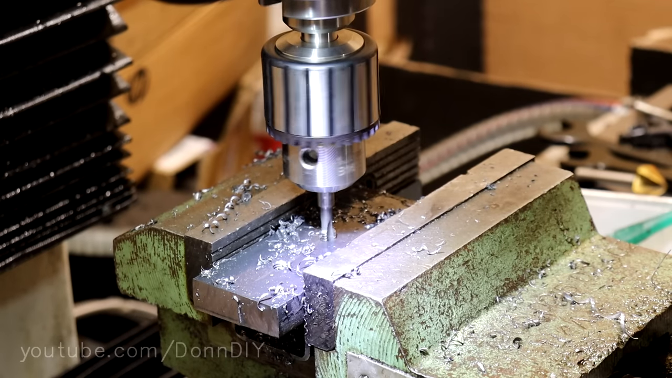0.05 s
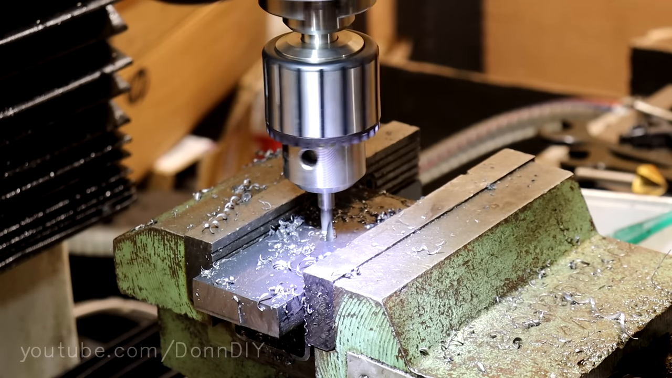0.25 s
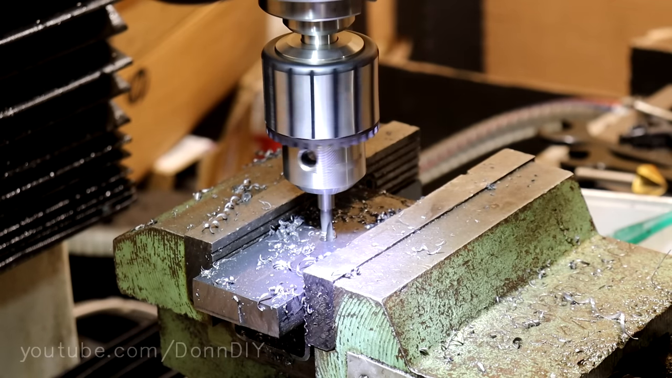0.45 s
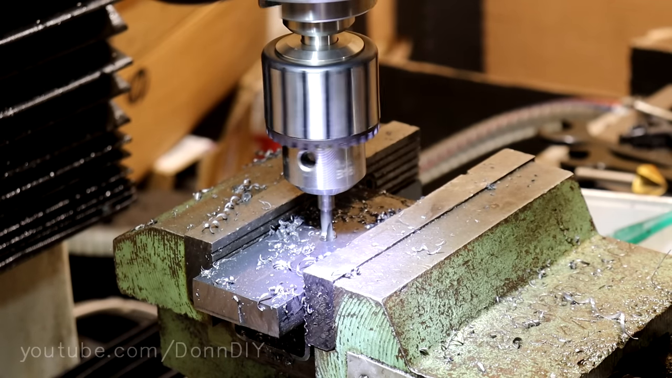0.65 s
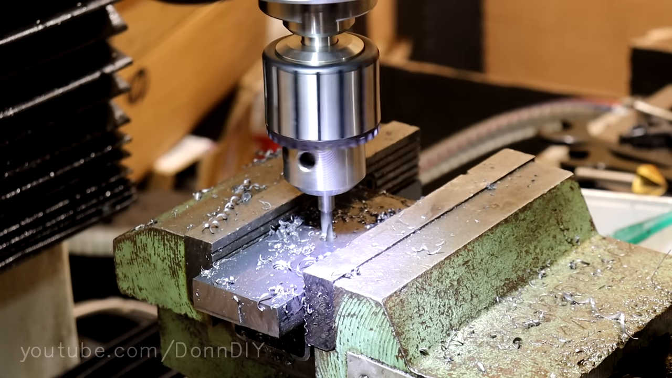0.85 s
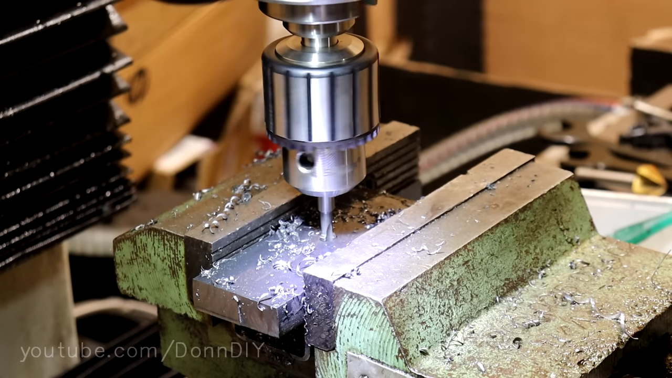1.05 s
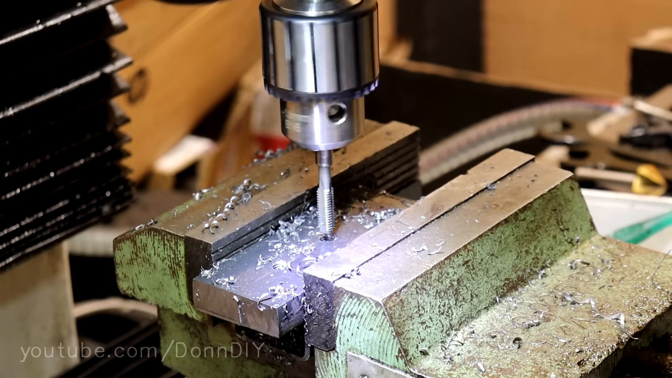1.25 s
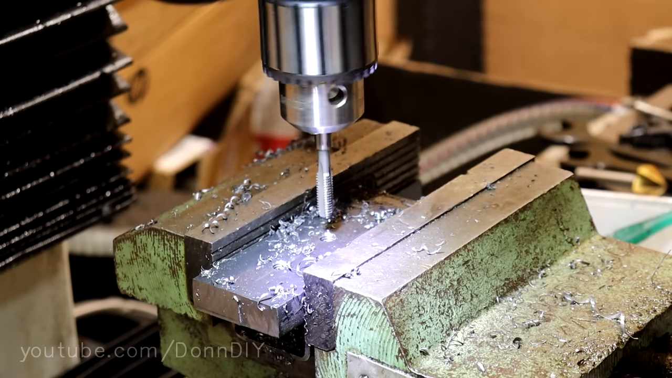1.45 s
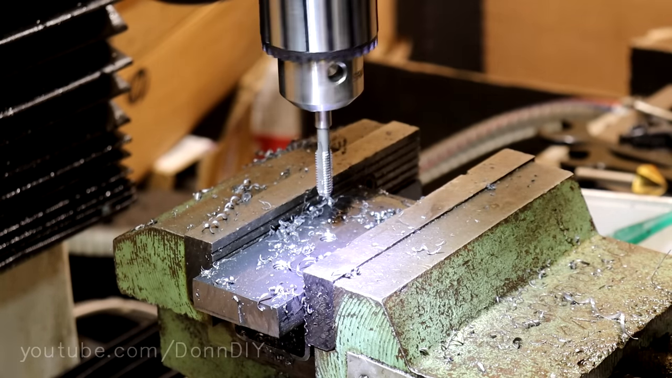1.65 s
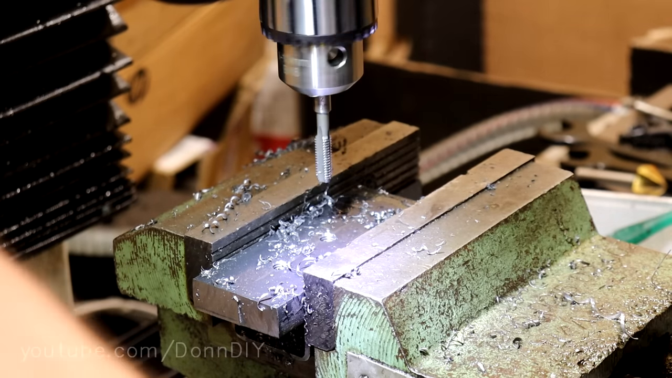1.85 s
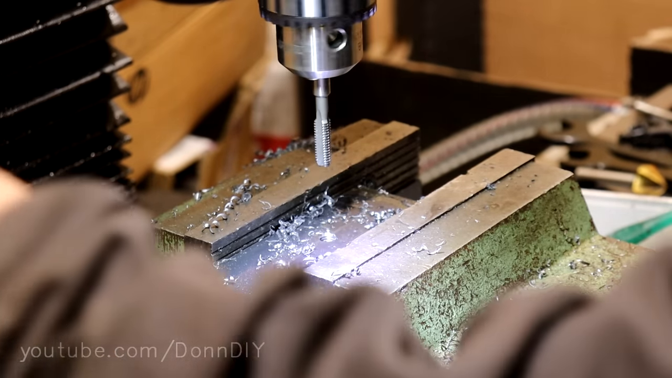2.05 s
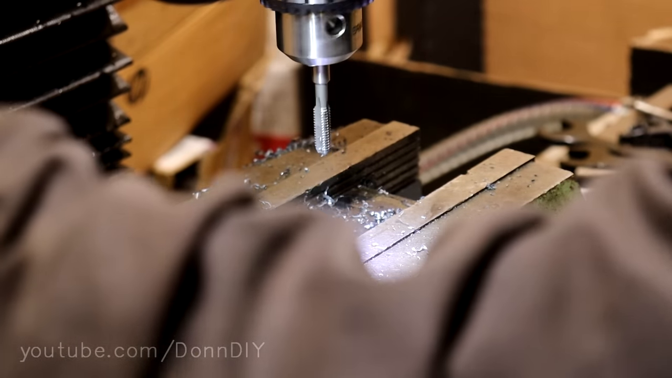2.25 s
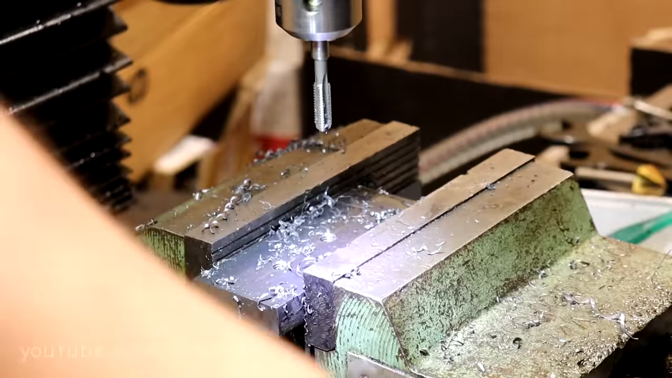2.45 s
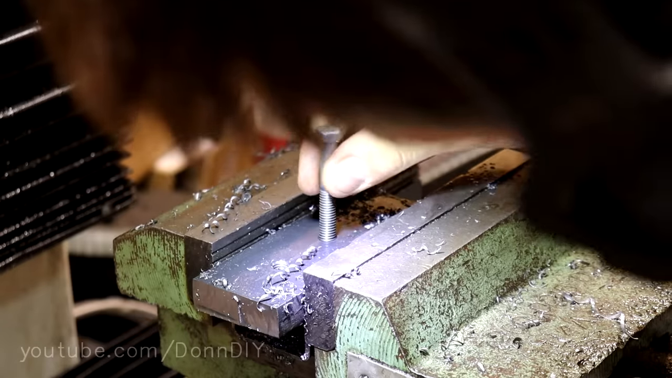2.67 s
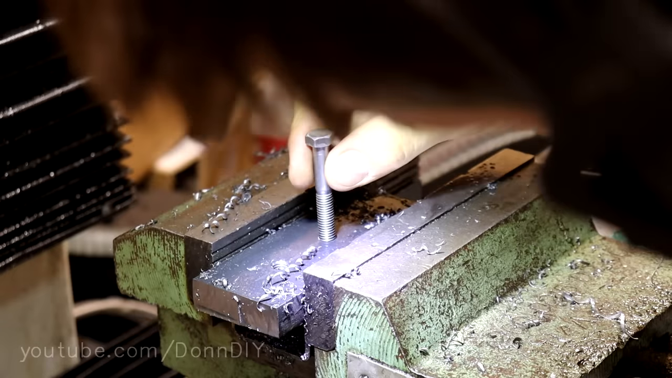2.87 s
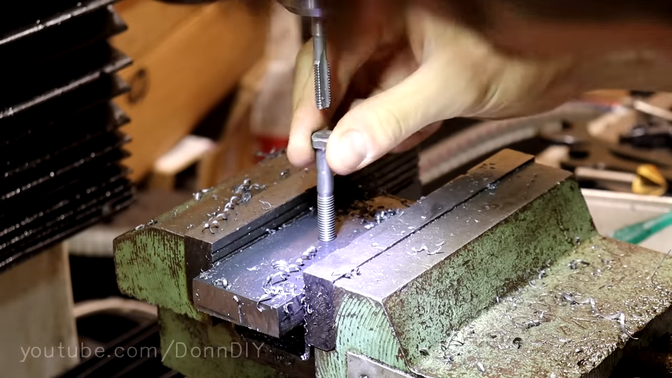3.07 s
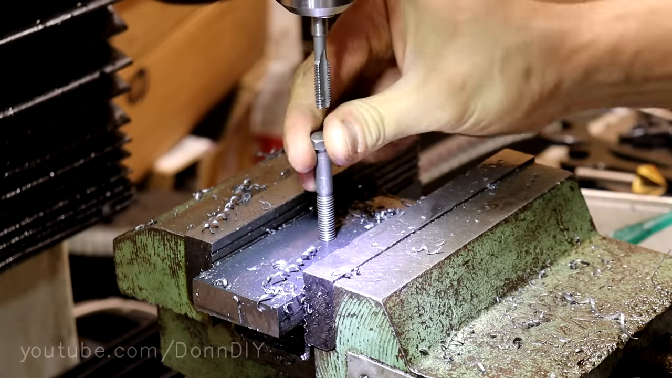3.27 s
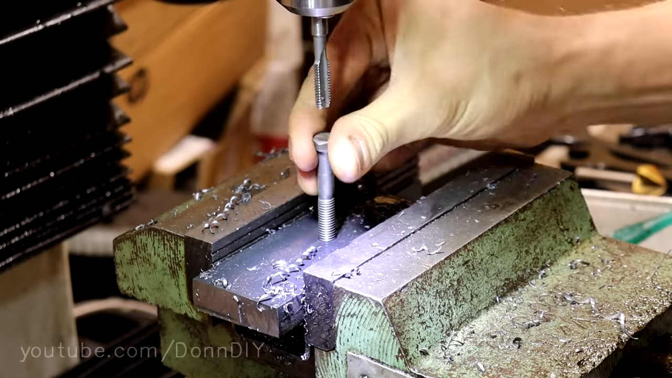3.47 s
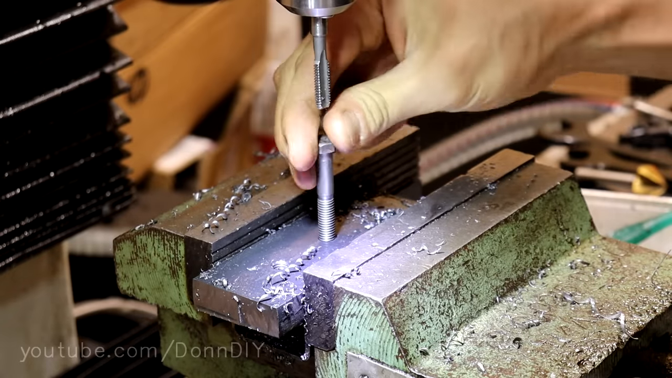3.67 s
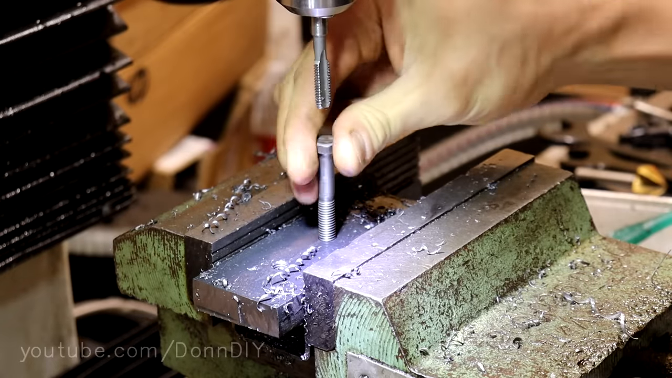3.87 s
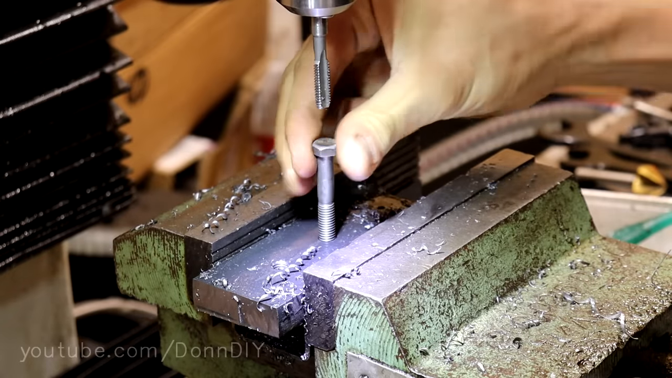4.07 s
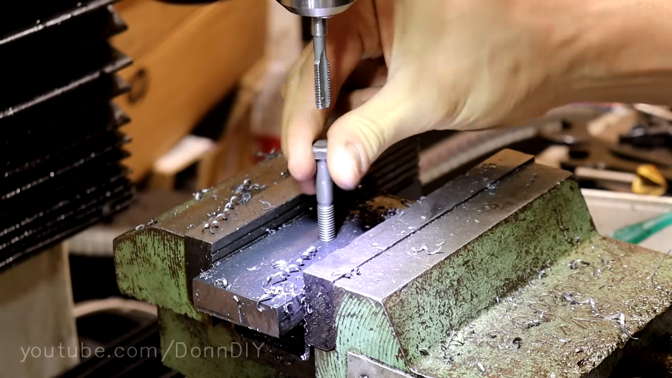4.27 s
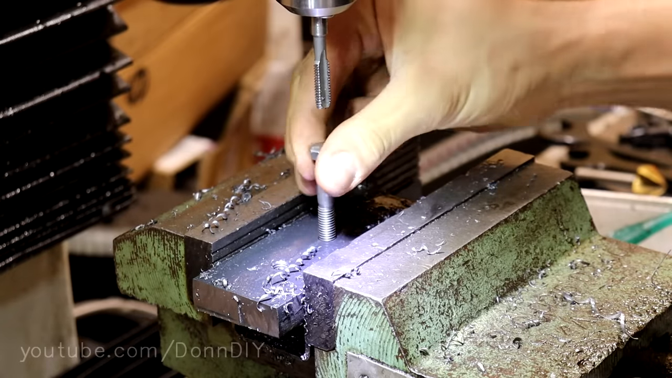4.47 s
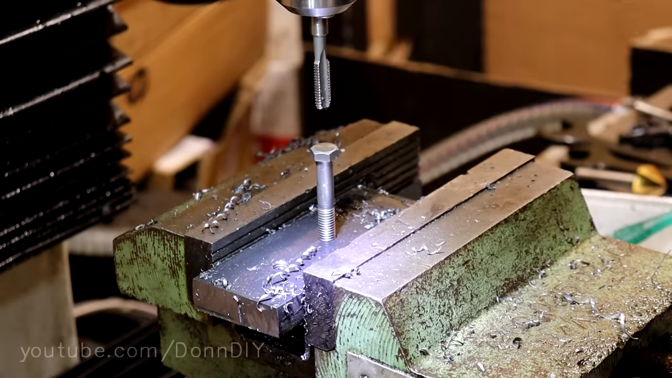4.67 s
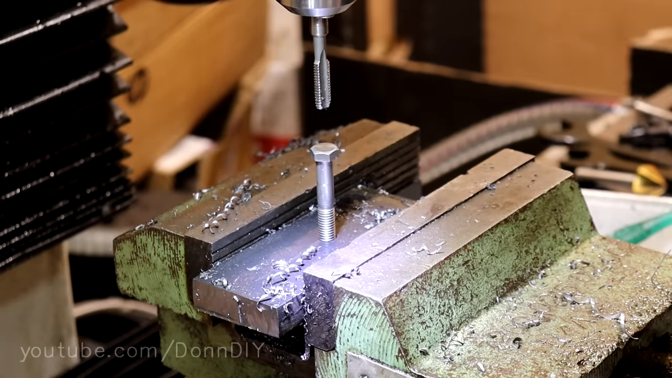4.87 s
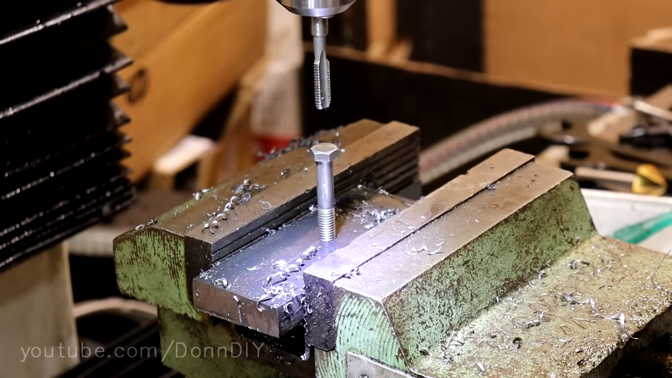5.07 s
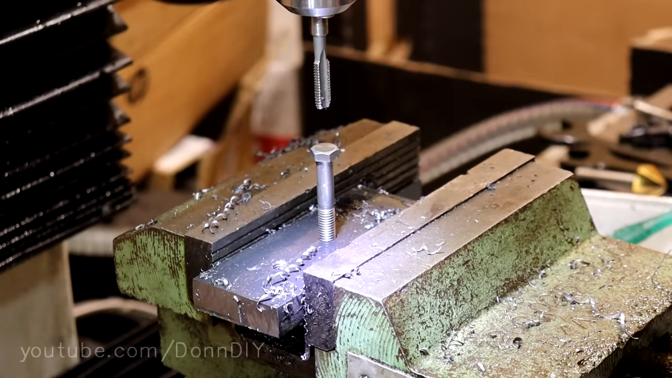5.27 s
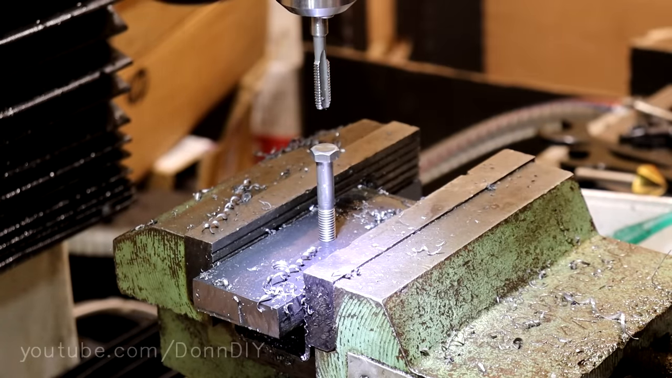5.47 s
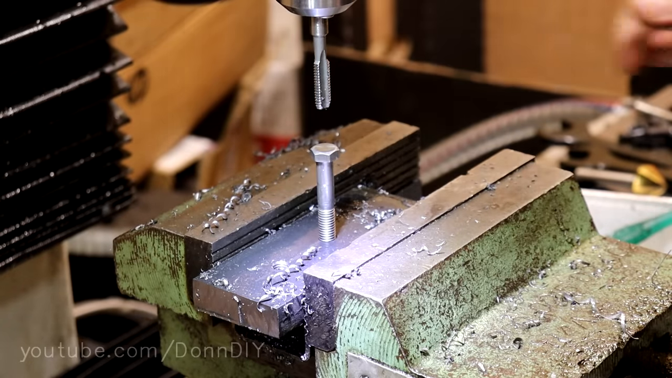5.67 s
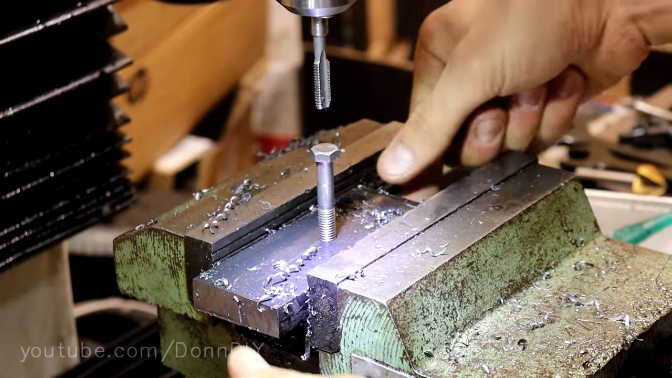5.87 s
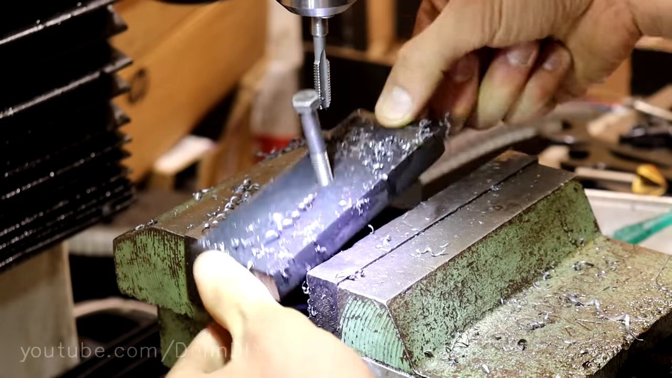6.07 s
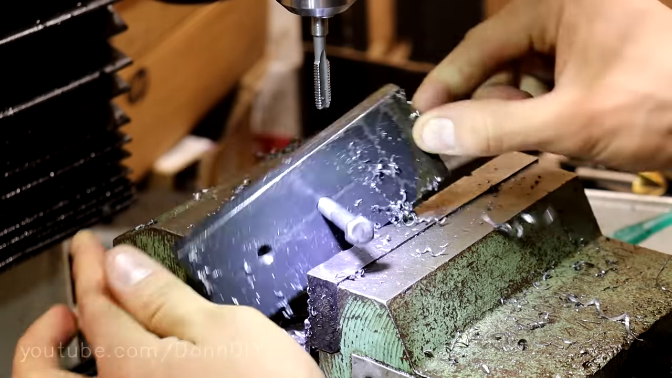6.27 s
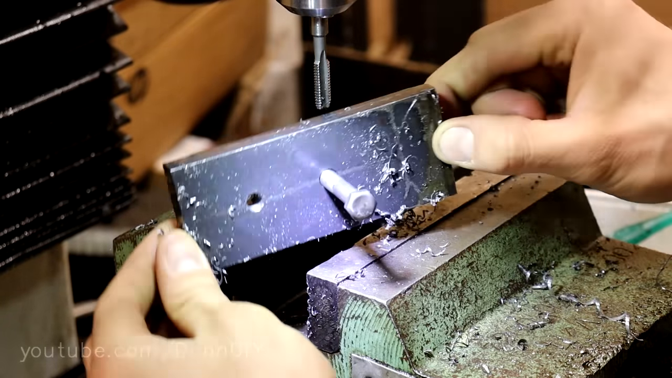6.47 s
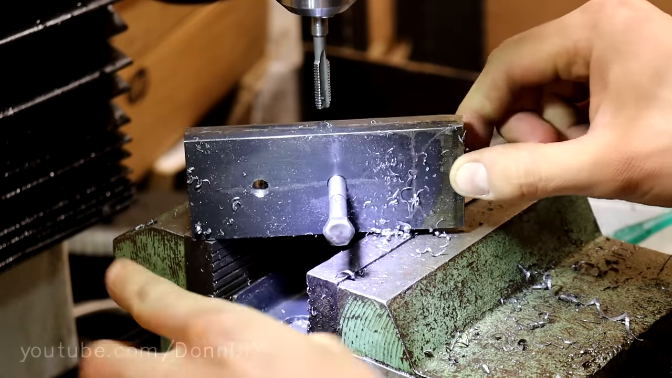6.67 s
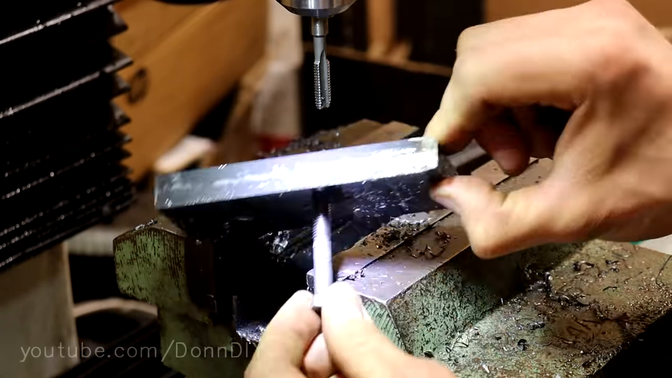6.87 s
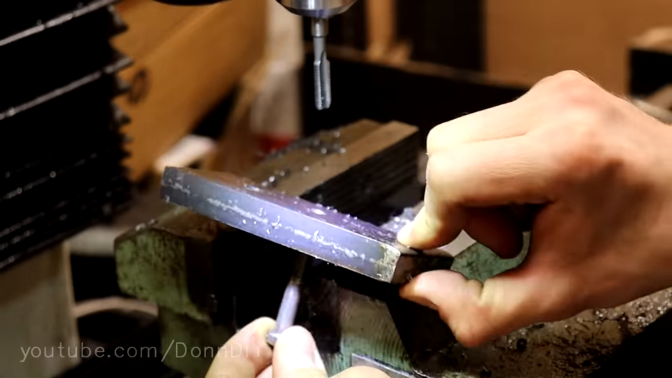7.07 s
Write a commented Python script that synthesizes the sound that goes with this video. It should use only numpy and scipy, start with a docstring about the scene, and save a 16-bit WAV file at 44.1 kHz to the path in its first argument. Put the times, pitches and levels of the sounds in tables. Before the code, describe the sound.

Geared drilling machine runs, reverses and cuts off, followed by faint metal scrapes, knocks on a vise and a tinkling steel plate.

```python
"""A geared drill press whines and roars as it taps a hole in steel, reverses, is switched off and coasts.
Its gear teeth tick in the housing and swarf snaps off the tap; the machine sound is then cut off.
In the quiet workshop, fingers spin a bolt into the thread with short scrapes, sleeves brush the vise,
and blows knock it open, ringing the iron and shaking the bench.
The steel plate is lifted out, tinkling and scraping on the jaws."""
import sys
import numpy as np
from scipy import signal
from scipy.fft import rfft, irfft, next_fast_len
from scipy.io import wavfile
from scipy.ndimage import uniform_filter1d

SR = 44100
rng = np.random.default_rng(int(sys.argv[2]) if len(sys.argv) > 2 else 0)


def master(y):
    """Save y as 16-bit WAV."""
    cut = np.clip(np.atleast_2d(y).T, -1, 1)
    pcm = np.round(cut * 32767)  # scale
    wavfile.write(sys.argv[1], SR, pcm.astype(np.int16))


N = 314433
REVERSE_S, OFF_S, CUT_S = 1.15, 2.29, 2.608
BLOW_RISE_S, BLOW_RISE_SHARE, BLOW_HOLD, CRACK_S = 0.00088, 0.11, 1.18, 0.0016
SCRAPE_RISE_S, SCRAPE_HOLD = 0.0046, 2.3
SPOT_DB, SPOT_RATE_HZ = 2.5, 25  # a wandering contact point favours changing modes


def undb(db):
    """Decibels to gain."""
    return 10 ** (np.asarray(db) / 20)


def unit(x):
    """Scale to rms 1."""
    return x / np.sqrt(np.mean(x ** 2))


def walk(rate_hz, size=N):
    """Smoothed random steps, rms 1."""
    step = int(SR / rate_hz)
    held = np.repeat(rng.standard_normal(size // step + 1), step)
    return unit(uniform_filter1d(uniform_filter1d(held, step), step)[:size])


def coloured(points):
    """Noise shaped by (freq_hz, level_db) points, rms 1."""
    hz, db = np.transpose(points)
    n = next_fast_len(N)
    bins_hz = np.maximum(np.arange(n // 2 + 1) * SR / n, 1)
    gain = undb(np.interp(np.log(bins_hz), np.log(hz), db))
    return unit(irfft(rfft(rng.standard_normal(n)) * gain, n)[:N])


def ring(force, modes, steep=False, spot_db=0):
    """Drive (pitch_hz, width_hz, level_db) modes at about unit noise gain; steep filters twice."""
    active = np.flatnonzero(force)
    span = slice(active[0], active[-1] + SR // 5)
    drive = force[span]
    out = np.zeros(N)
    for k, (hz, width_hz, db) in enumerate(modes):
        mode = signal.iirpeak(hz, hz / width_hz, SR)
        coupling = undb(spot_db * walk(SPOT_RATE_HZ, len(drive))) if spot_db else 1
        motion = signal.lfilter(*mode, drive * coupling)
        if steep:
            motion = np.sqrt(2) * signal.lfilter(*mode, motion)
        out[span] += (-1) ** k * undb(db) * motion / np.sqrt(np.pi * width_hz / SR)
    return out / np.sqrt(sum(undb(2 * db) for _, _, db in modes))


def pressure(start_s, level_db, rise_s, decay_s, hold=1.2):
    """Each touch rises and lets go; a higher hold lingers, then stops short."""
    force = np.zeros(N)
    for start, gain, rise, decay in np.broadcast(start_s, undb(level_db), rise_s, decay_s):
        i = int(start * SR)
        t = np.arange(min(N - i, int((rise + 6 * decay) * SR))) / SR
        release = np.exp(-(np.maximum(t - rise, 0) / decay) ** hold)
        force[i:i + len(t)] += gain * np.minimum(t / rise, 1) * release
    return force


def bursts(start_s, level_db, rise_s, decay_s, hold=1.0, grain_db=2.0):
    """Contact pressure acting through noise grains of uneven size."""
    force = pressure(start_s, level_db, rise_s, decay_s, hold)
    active = np.flatnonzero(force)
    sizes = undb(grain_db * rng.standard_normal(len(active) // 64 + 1))
    grains = np.repeat(sizes, 64)[:len(active)]
    force[active] *= unit(grains * rng.standard_normal(len(active)))
    return force


def stages(t, cutting_db, backing_db, coasting_db):
    """Gain that steps at the reversal and at switch-off."""
    corners_s = [REVERSE_S - 0.005, REVERSE_S + 0.0034, OFF_S - 0.01, OFF_S + 0.019]
    return undb(np.interp(t, corners_s, [cutting_db, backing_db, backing_db, coasting_db]))


def run_down(t, powered_db, off_db, db_per_s, unload_s=0.029):
    """Gain that jumps as the load comes off, then drifts while the gears coast."""
    jump_db = np.interp(t, [OFF_S - unload_s, OFF_S], [powered_db, off_db])
    return undb(jump_db + db_per_s * np.maximum(t - OFF_S, 0))


# Gear and motor tones: pitch_hz
WHINE_HZ = (263.6, 306.5, 396, 547, 585.6, 647.2, 712, 732, 757, 893, 1024, 1161, 1195, 1329, 1440, 1463,
            1610, 1752, 2196, 2782, 3818)
# Per tone: cutting_db, backing_db, flutter_hz
WHINE_LEVELS = [(-42, -45.5, 30), (-35, -36, 30), (-39.5, -32, 30), (-29, -32, 26), (-31, -28, 18),
                (-30.5, -25.5, 16), (-64, -40, 21), (-32.5, -32, 20), (-40.5, -42.5, 33), (-42.5, -65, 50),
                (-32.5, -36.5, 38), (-33.5, -37.5, 60), (-37, -35.5, 80), (-38, -38, 57), (-33.5, -36, 60),
                (-36, -40, 50), (-43.5, -46, 21), (-45, -44.5, 32), (-44.5, -48, 40), (-45, -45, 31),
                (-44, -39, 32)]
def whines(t):
    """Gears and motor: firm tones, each in a fluttering halo."""
    out = 0
    for hz, (cutting_db, backing_db, flutter_hz) in zip(WHINE_HZ, WHINE_LEVELS):
        steady = 85 / flutter_hz
        halo = walk(flutter_hz) + 1j * walk(flutter_hz)
        phasor = (steady + halo) / np.sqrt(1 + steady ** 2 / 2)
        tone = np.imag(phasor * np.exp(2j * np.pi * hz * t))
        out += stages(t, cutting_db, backing_db, coasting_db=-60) * tone
    return out


# Gear housing modes: pitch_hz, width_hz, level_db
HOUSING_MODES = [(3025, 160, -3), (3290, 130, -2), (3600, 200, -1), (3800, 220, 0), (4020, 250, -5),
                 (4400, 350, -9), (4478, 50, -9)]
def gear_teeth(t, mesh_hz=131.65, jitter=0.0015, spread_db=2.1):
    """Teeth tick as they meet and their flanks scuff; both ring the housing."""
    count = int(N / SR * mesh_hz) - 2
    at = (1 + np.arange(count) + jitter * rng.standard_normal(count)) * SR / mesh_hz
    size = undb(spread_db * rng.standard_normal(count))
    impacts = np.zeros(N)
    impacts[at.astype(int)] = size * (1 - at % 1)  # split between adjacent samples
    impacts[at.astype(int) + 1] = size * (at % 1)
    ticks = unit(ring(impacts, HOUSING_MODES))
    scuff = undb(1.5 * walk(11.57)) * ring(rng.standard_normal(N), HOUSING_MODES)
    return stages(t, -40.5, -35, -66) * ticks + stages(t, -60, -35, -74) * scuff


# Running noise spectra: freq_hz, level_db
ROAR_SPECTRUM = [(35, -68), (60, -37.5), (177, -20.5), (297, -7.5), (404, -10), (481, -13.5), (572, -5),
                 (735, -10), (825, -12.5), (1020, -11), (1100, -11.5), (1470, -8.5), (1850, -17),
                 (3780, -19.5), (6000, -52), (7800, -70), (13200, -120)]
HISS_SPECTRUM = [(2350, -41), (4000, -1), (5280, -9.5), (7390, -10.5), (8760, -16.5), (9930, -26.5),
                 (12000, -27), (15600, -34)]
def running_noise(t):
    """Roar, hiss and rumble of the press jump up at switch-off, then fade."""
    roar = run_down(t, -26, -21.5, db_per_s=-49.5) * undb(1.3 * walk(8.86)) * coloured(ROAR_SPECTRUM)
    hiss = run_down(t, -40, -37, db_per_s=-48) * undb(0.5 * walk(41.6)) * coloured(HISS_SPECTRUM)
    rumble = ring(rng.standard_normal(N), [(42, 200, 0)], steep=True)
    return roar + hiss + run_down(t, -57, -43, db_per_s=-26) * rumble


# Steel chips: start_s, level_db, centre_hz, decay_s
SWARF_CHIPS = [(.228, -53, 14100, .012), (.606, -52, 12500, .02), (.935, -46, 12000, .002),
               (2.755, -66, 9000, .025), (6.03, -58, 13900, .03), (6.074, -59, 13000, 0.038),
               (6.645, -55, 8000, 0.033), (6.732, -49.5, 7900, 0.0027), (6.85, -65, 7800, .03)]
def swarf(q=3.2):
    """Chips snap off the tap, fall and slide: small bright ticks and rustles."""
    out = 0
    for start_s, db, hz, decay_s in SWARF_CHIPS:
        force = bursts(start_s, db, 0.25 * decay_s, decay_s, SCRAPE_HOLD)
        out += ring(force, [(hz, hz / q, 0)], steep=True)
    return out


# Lever and switch clicks: start_s, thud_db, snap_db, fizz_db, rise_s
SWITCH_CLICKS = [(2.159, -25, -20, -52, 0.0015), (2.278, -21, -26, -34, 0.009),
                 (2.362, -27, -33.5, -37, .014), (2.385, -16, -32, -41, 0.0021)]
def switch(decay_s=0.0049):
    """Bright snaps, each with a dull thud through the column."""
    start_s, thud_db, snap_db, fizz_db, rise_s = np.transpose(SWITCH_CLICKS)
    thud = ring(bursts(start_s, thud_db, rise_s, decay_s), [(1100, 520, -9), (2590, 560, 0)])
    snap = ring(bursts(start_s, snap_db, rise_s, decay_s), [(5000, 2600, 0)], steep=True)
    fizz = ring(bursts(start_s, fizz_db, rise_s, decay_s), [(13100, 22000, 0)], steep=True)
    return thud + snap + fizz


# Casting modes: pitch_hz, width_hz, level_db
CASTING_MODES = [(298, 133, -3.5), (391.6, 66, 0.5), (575, 61, -1.5), (712, 71, -6), (1035, 93, -11.5),
                 (1437, 130, -6)]
def groan(t):
    """Free teeth shake the casting, louder as the press coasts."""
    casting = ring(rng.standard_normal(N), CASTING_MODES, steep=True)
    return run_down(t, -55, -33, db_per_s=20.3) * casting


# Workshop background spectrum: freq_hz, level_db
HUSH_SPECTRUM = [(12, -37), (20, 4), (191, 2.5), (352, -4), (812, -5), (1040, -11.5), (1170, -8),
                 (1720, -12.5), (3650, -14), (15600, -21)]
def workshop_hush(hush_db=-59, hum_hz=102.3, hum_db=-69.5):
    """Quiet, slightly wavering noise with a faint low hum."""
    hush = undb(hush_db + 0.27 * walk(3.3)) * coloured(HUSH_SPECTRUM)
    hum = ring(rng.standard_normal(N), [(hum_hz, 8.0, 0)], steep=True)
    return hush + undb(hum_db) * hum


# Bolt turning in the thread: start_s, level_db, hardness_db, decay_s
BOLT_SCRAPES = [(2.623, -50, 2, 0.027), (2.645, -50, 2, 0.013), (2.685, -53.5, 0, 0.013),
                (2.859, -58.5, 1, 0.02), (2.919, -51, 15, .025), (2.952, -53, 10, 0.02),
                (3.0464, -60.5, 5, 0.022), (3.122, -54.5, 12, .012), (3.31, -64, 10, .008),
                (3.337, -63, 15, .022), (3.46, -62, 7, 0.022), (3.621, -60, 6, .02), (3.84, -57, 9, 0.034),
                (3.925, -61.5, -3, 0.029), (4.022, -56, -2, 0.023), (4.17, -56.5, 3, 0.015),
                (4.259, -61, -4.5, .012), (4.316, -60, 5, .025), (4.375, -61.5, -5, 0.013),
                (4.553, -69.5, -14.5, 0.021)]
# Thread, shank, loose bolt and steel contact grit: pitch_hz, width_hz, level_db
THREAD_MODES = [(2540, 680, -5), (3070, 210, -7), (3670, 150, 0), (4160, 1400, -7.5), (6000, 500, -16)]
SHANK_MODES = [(792, 150, 0.5), (1190, 330, -1), (2010, 600, -10.5)]
SEATING_MODES = [(8550, 150, -12), (9200, 99, 0)]
GRIT_BANDS = [(4600, 4600, 14), (8760, 4100, 6), (13000, 5300, 0)]
def bolt():
    """Scraping flanks ring thread and shank; the loose bolt tinkles on its first two touches."""
    start_s, db, hardness_db, decay_s = np.transpose(BOLT_SCRAPES)
    scrape = (SCRAPE_RISE_S, decay_s, SCRAPE_HOLD)
    chirp = ring(bursts(start_s, db, *scrape), THREAD_MODES)
    shank = ring(bursts(start_s, db - hardness_db, *scrape), SHANK_MODES, steep=True, spot_db=SPOT_DB)
    grit = ring(bursts(start_s, db - 8 - 0.45 * hardness_db, *scrape), GRIT_BANDS)
    tinkle = ring(bursts(start_s[:2], db[:2] - 6.5, SCRAPE_RISE_S, decay_s[:2]), SEATING_MODES)
    return chirp + shank + grit + tinkle


# Brushes against the vise: start_s, level_db, hardness_db, decay_s
SLEEVE_BRUSHES = [(2.675, -47, 6, .05), (3.47, -47, 15, 0.12), (4.62, -49, 8.5, 0.046),
                  (4.708, -47, 13, 0.048), (4.83, -47.5, 9, 0.03), (4.9, -47.5, 14, 0.029),
                  (4.93, -50.5, -6.5, 0.033), (4.956, -37.5, 24, 0.026), (5.029, -48, 11, 0.11),
                  (5.7, -49, -3, 0.063), (5.749, -43, 10, 0.034), (5.81, -48.5, 24, 0.084)]
# Cloth rustle and vise body: pitch_hz, width_hz, level_db
RUSTLE_BANDS = [(1020, 2450, 4), (2500, 3800, 5.5), (7800, 3400, -3.5)]
THUMP_MODES = [(290, 121, -3), (398, 55, -1.5), (487, 130, 0), (600, 210, -5), (870, 180, -4),
               (1145, 260, -7)]
def sleeves(rise_share=0.49, hold=1.15):
    """Hands and sleeves rustle over the vise; softer touches thump more."""
    start_s, db, hardness_db, decay_s = np.transpose(SLEEVE_BRUSHES)
    brush = (rise_share * decay_s, decay_s, hold)
    rustle = ring(bursts(start_s, db, *brush), RUSTLE_BANDS)
    thump = ring(bursts(start_s, db - hardness_db, *brush), THUMP_MODES, steep=True)
    return rustle + thump


# Blows on vise and handle: start_s, level_db, hardness_db, decay_s, bench_db, handle_db
VISE_BLOWS = [(5.148, -32, 5, 0.013, -40, -25), (5.164, -34, 1, 0.004, -55, -28),
              (5.172, -40.5, -3, 0.02, -55, -37), (5.198, -27, 1, 0.029, -41, -45),
              (5.223, -32.5, -2, 0.016, -54, -38), (5.256, -30, 6, 0.0086, -32, -40),
              (5.262, -31, -8, 0.012, -31, -35), (5.341, -49, 3, 0.02, -52, -58),
              (5.363, -41, -10, 0.023, -40.5, -55), (5.387, -42.5, 6, 0.0074, -51, -49),
              (5.554, -30, -9, 0.007, -40, -40), (5.571, -37.5, -10, 0.036, -40, -48),
              (5.6, -40, -14, 0.0058, -28, -56), (5.608, -42, -14, 0.0048, -22, -56),
              (5.615, -43.5, -10, 0.011, -25, -56), (5.632, -45, -10, 0.006, -19, -60),
              (5.644, -49, -9, 0.009, -26, -62)]
# Vise iron, loose handle and bench: pitch_hz, width_hz, level_db
CLANK_MODES = [(1185, 150, 5), (1620, 130, 4), (2035, 240, 1), (2380, 160, -0.5), (2780, 170, -2),
               (3400, 190, -4), (3750, 200, -7), (5540, 150, -9)]
RASP_BANDS = [(4140, 1800, 1.5), (5970, 1200, 0.5), (8300, 1800, -8), (12000, 2100, -27)]
HANDLE_MODES = [(1010, 120, -4), (1420, 110, -1), (2450, 300, -1), (3310, 220, -2), (3640, 200, -4),
                (4600, 640, 0.5)]
BENCH_MODES = [(45, 66, -19), (110, 60, -5), (209, 120, -0.5)]
def vise():
    """Blows ring the iron, rattle the handle and shake the bench; harder ones are brighter."""
    start_s, db, hardness_db, decay_s, bench_db, handle_db = np.transpose(VISE_BLOWS)
    rise_s = BLOW_RISE_S + BLOW_RISE_SHARE * decay_s
    blow = (rise_s, decay_s, BLOW_HOLD)
    onset = (CRACK_S / 2, CRACK_S, BLOW_HOLD)
    thump = ring(bursts(start_s, db - hardness_db, *blow), THUMP_MODES, steep=True)
    clank = ring(bursts(start_s, db, *blow), CLANK_MODES, spot_db=SPOT_DB)
    rasp = ring(bursts(start_s, db - 4 + 0.9 * hardness_db, *blow), RASP_BANDS)
    crack = ring(bursts(start_s, db - 11 + 0.8 * hardness_db, *onset), GRIT_BANDS)
    handle = ring(bursts(start_s, handle_db, rise_s, decay_s), HANDLE_MODES, steep=True)
    bench = ring(bursts(start_s, bench_db, rise_s, decay_s), BENCH_MODES, steep=True)
    return thump + clank + rasp + crack + handle + bench


# Clear plate modes: pitch_hz
PLATE_RING_HZ = (4980, 6742, 12500, 14050)
def plate_ring(t, start_s, mode_levels_db, rise_s, decay_s, linger_s=0.0053):
    """Wavering plate modes follow the contact pressure and ring on a little."""
    pole = np.exp(-1 / (linger_s * SR))
    out = 0
    for db, hz in zip(mode_levels_db, PLATE_RING_HZ):
        envelope = signal.lfilter([1 - pole], [1, -pole], pressure(start_s, db, rise_s, decay_s))
        flicker = undb(3.2 * walk(170))
        tone = np.sqrt(2) * np.sin(2 * np.pi * hz * t + 1.04 * walk(110))
        out += envelope * flicker * tone
    return out


# Plate on the jaws: start_s, level_db, hardness_db, decay_s, low_ring_db, high_ring_db
PLATE_TOUCHES = [(5.9754, -52, -3, 0.045, -58.5, -66), (6.0094, -62, 3, .012, -73, -59),
                 (6.0294, -63, -11, 0.032, -71, -60), (6.0773, -38, -3, 0.021, -54, -55),
                 (6.134, -52, -27, 0.016, -76, -68), (6.1834, -31.5, 5.5, 0.014, -45, -64),
                 (6.258, -42, -19, 0.0092, -64, -61), (6.2876, -33, 0, 0.0073, -46, -17.5),
                 (6.3038, -30, 5, 0.0023, -48, -11), (6.307, -36.5, 0.5, 0.017, -60, -54),
                 (6.322, -39, -2, 0.032, -59, -59), (6.352, -34, -7, 0.022, -62, -61),
                 (6.397, -42, -21, 0.012, -67, -65), (6.423, -47, -23, 0.023, -71, -70),
                 (6.457, -39, -13, 0.011, -63, -83), (6.484, -41, -12, 0.019, -59, -56),
                 (6.5797, -33, 4.5, 0.022, -58, -52), (6.594, -37.5, 17, 0.0075, -48, -35),
                 (6.678, -51, 16.5, 0.013, -63, -58), (6.937, -45.5, -15, 0.076, -80, -53.5),
                 (6.976, -40, -23, 0.041, -78, -71), (7.0494, -69, -5, 0.013, -71, -51),
                 (7.079, -49, -3.5, 0.015, -69, -72)]
# Broad plate modes: pitch_hz, width_hz, level_db
BODY_MODES = [(223, 91, -7), (456, 540, -7), (956, 760, -4.5)]
KNOCK_MODES = [(1180, 750, 6.5), (1480, 270, 7), (1887, 170, 4.5), (2800, 560, 4), (3630, 140, -7)]
def plate_knocks(t, soft_rise_s_per_db=0.0003):
    """The plate knocks and tinkles on the jaws; soft touches rise slower and sound duller."""
    start_s, db, hardness_db, decay_s, low_db, high_db = np.transpose(PLATE_TOUCHES)
    rise_s = BLOW_RISE_S + BLOW_RISE_SHARE * decay_s + soft_rise_s_per_db * np.maximum(-hardness_db, 0)
    blow = (rise_s, decay_s, BLOW_HOLD)
    knock_db = db + hardness_db
    body = ring(bursts(start_s, db, *blow), BODY_MODES, steep=True)
    knock = ring(bursts(start_s, knock_db, *blow), KNOCK_MODES)
    grit = ring(bursts(start_s, db - 12 + 0.7 * hardness_db, *blow), GRIT_BANDS)
    clink = ring(bursts(start_s, high_db - 10.5, CRACK_S / 2, CRACK_S), GRIT_BANDS)
    shimmer_db = -61 + 0.63 * (knock_db + 30)  # top two modes grow with the knock
    tinkle = plate_ring(t, start_s, [low_db, high_db, shimmer_db, shimmer_db - 2], rise_s, decay_s)
    return body + knock + grit + clink + tinkle


# Plate sliding on the jaw: start_s, level_db, decay_s
PLATE_SLIDES = [(6.256, -42, 0.011), (6.289, -34.5, .045), (6.351, -31, 0.026), (6.394, -37, 0.013),
                (6.418, -39.5, 0.024)]
# Edge squeals: start_s, level_db, rise_s, decay_s
EDGE_SQUEALS = [(6.335, -36, 0.024, 0.0095), (6.395, -53, 0.0091, 0.024), (6.448, -49.5, 0.0057, 0.0087)]
# Lowest bend and edge modes: pitch_hz, width_hz, level_db
BEND_MODE = [(680, 59, 0)]
EDGE_MODES = [(3420, 60, 2), (4310, 70, -4), (5260, 60, -4), (5990, 60, 1), (7710, 90, -8), (7970, 50, -3),
              (8900, 70, -11), (10400, 90, -19), (11400, 70, -18)]
def plate_scrapes():
    """The sliding plate hums in its lowest bend; its edge squeals along the jaw."""
    start_s, db, decay_s = np.transpose(PLATE_SLIDES)
    friction = bursts(start_s, db, SCRAPE_RISE_S, decay_s, SCRAPE_HOLD, grain_db=0.2)
    hum = ring(friction, BEND_MODE, steep=True)
    squeal = ring(bursts(*np.transpose(EDGE_SQUEALS)), EDGE_MODES)
    return hum + squeal


def room(direct, t60_s=0.32, tail_db=-17, build_s=0.0056):
    """A short diffuse tail from the workshop walls."""
    t = np.arange(int(0.4 * SR)) / SR
    tail = rng.standard_normal(len(t)) * undb(-60 * t / t60_s) * np.minimum(t / build_s, 1)
    tail /= np.sqrt(np.sum(tail ** 2))
    return direct + undb(tail_db) * signal.fftconvolve(direct, tail)[:N]


def scene():
    """The machine sound dips at a splice, then is cut off; hand work follows over the hush."""
    t = np.arange(N) / SR
    press = whines(t) + gear_teeth(t) + running_noise(t) + switch() + groan(t)
    splice = undb(-15 * np.exp(-((t - REVERSE_S) / 0.0029) ** 2))
    cut = np.clip((CUT_S - t) / 0.0022, 0, 1)
    contacts = swarf() + bolt() + sleeves() + vise() + plate_knocks(t) + plate_scrapes()
    return (cut * splice * press + room(contacts) + workshop_hush())[None]


def record(dry, top_hz=15680):
    """A steep low-pass removes the highest treble."""
    return signal.sosfilt(signal.ellip(10, 0.2, 70, top_hz, fs=SR, output="sos"), dry)


dry = scene()
out = record(dry)
master(out)
```